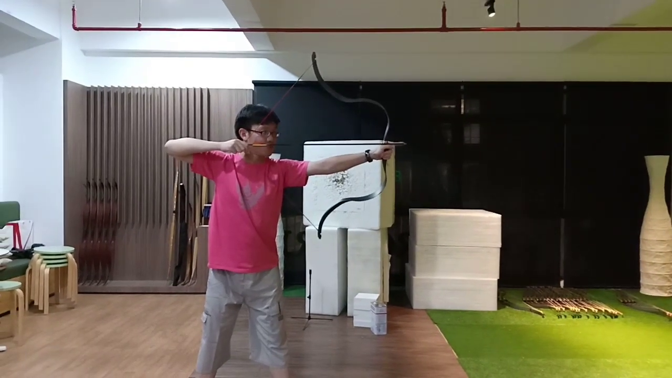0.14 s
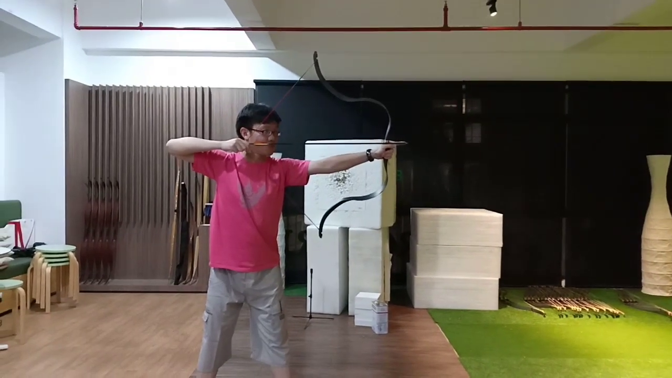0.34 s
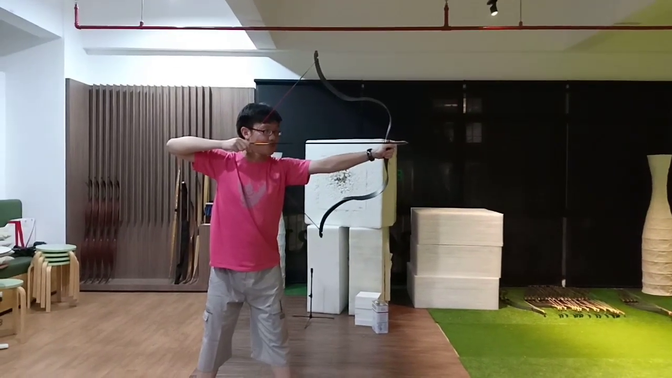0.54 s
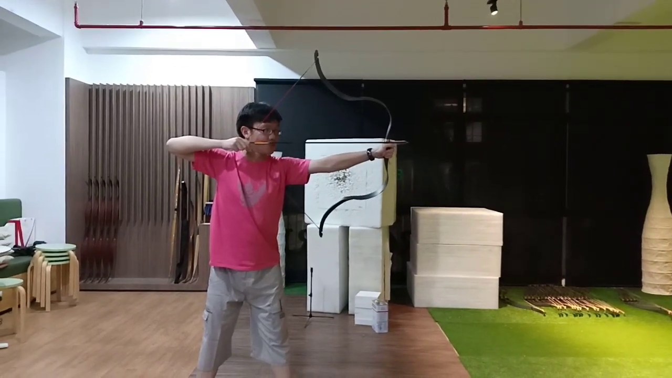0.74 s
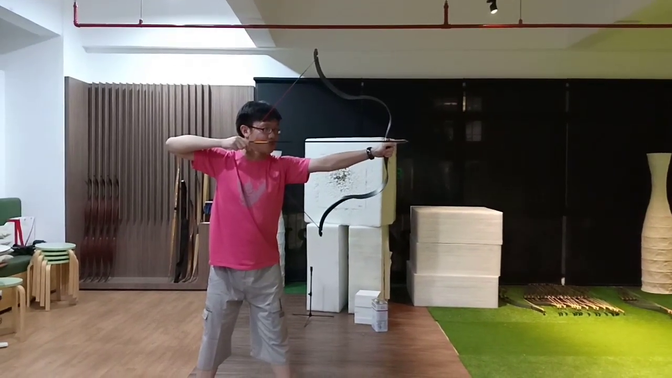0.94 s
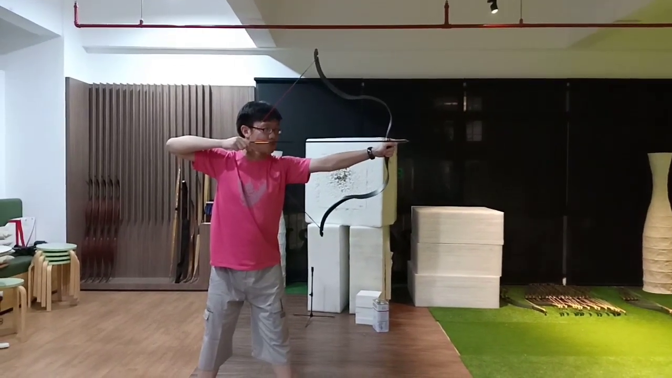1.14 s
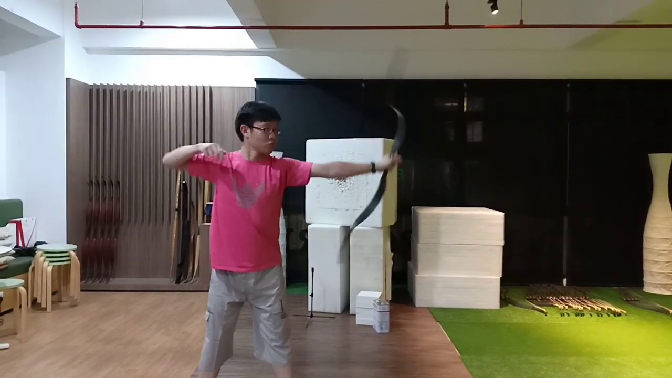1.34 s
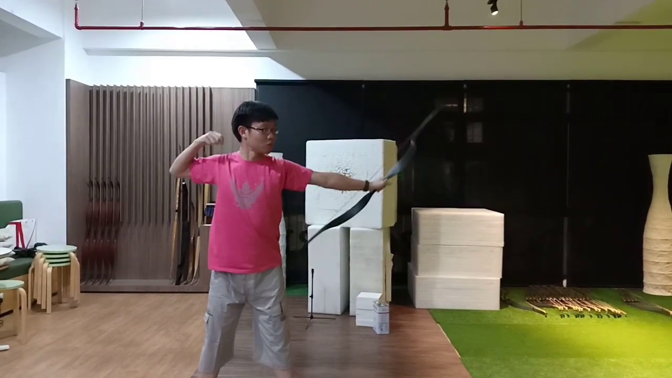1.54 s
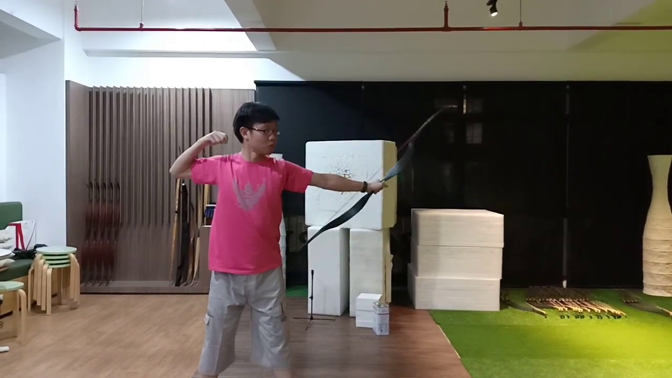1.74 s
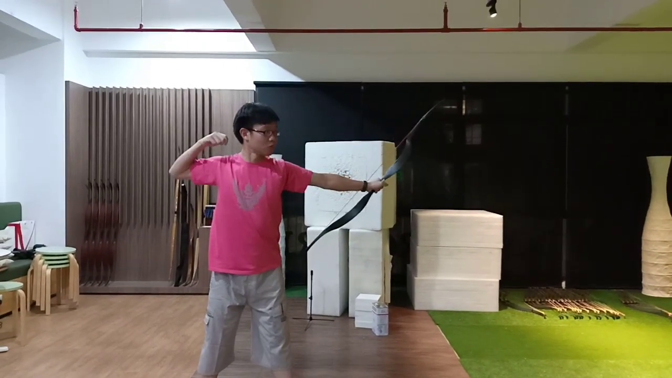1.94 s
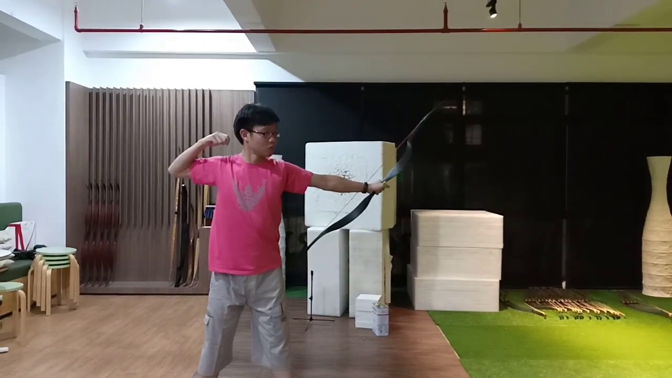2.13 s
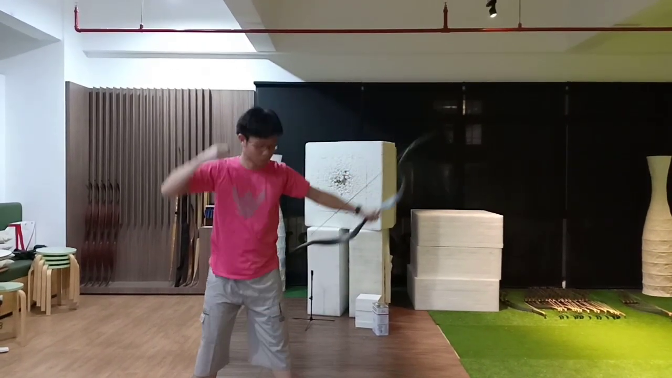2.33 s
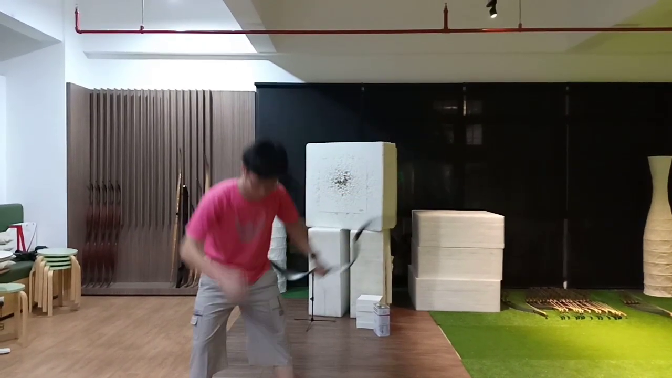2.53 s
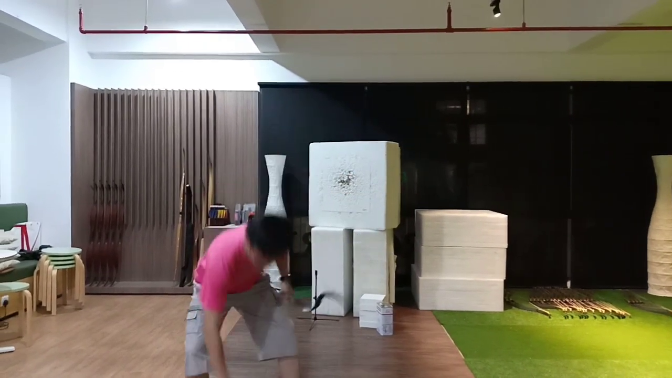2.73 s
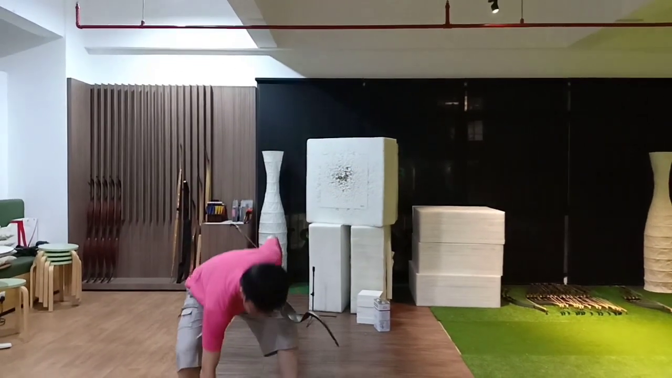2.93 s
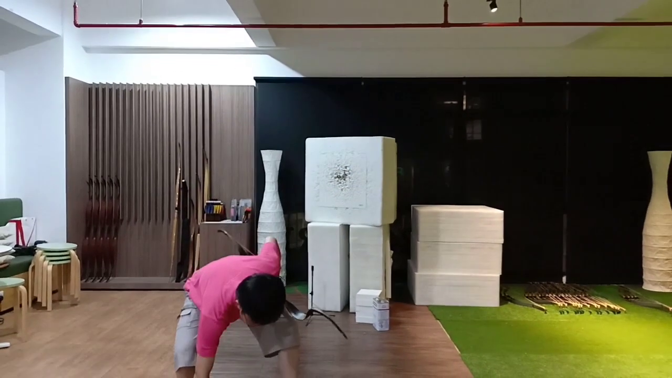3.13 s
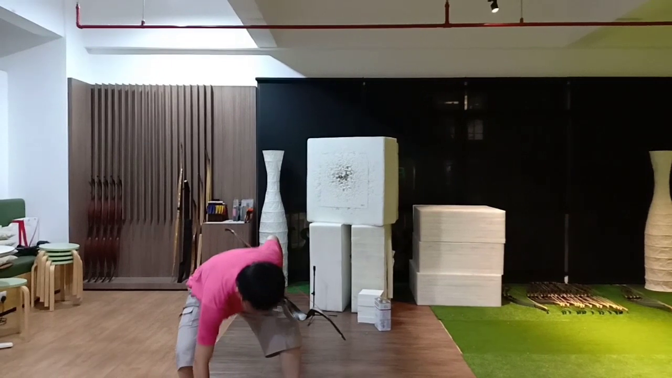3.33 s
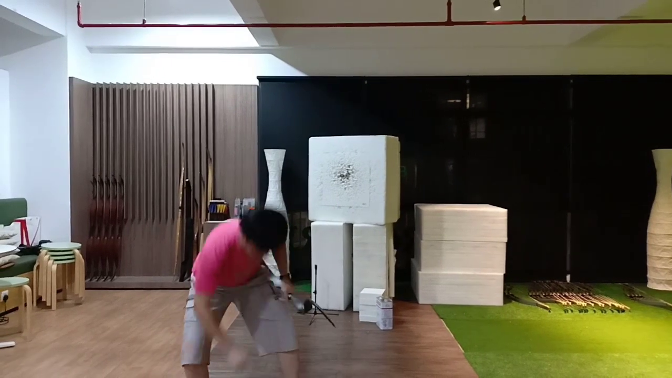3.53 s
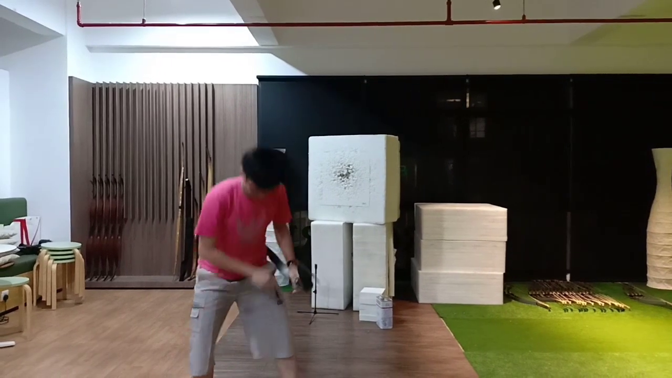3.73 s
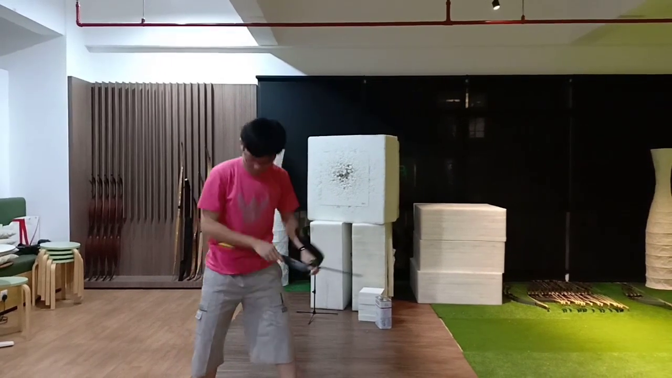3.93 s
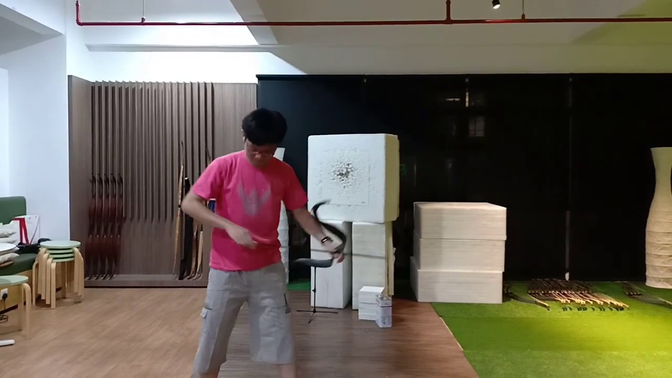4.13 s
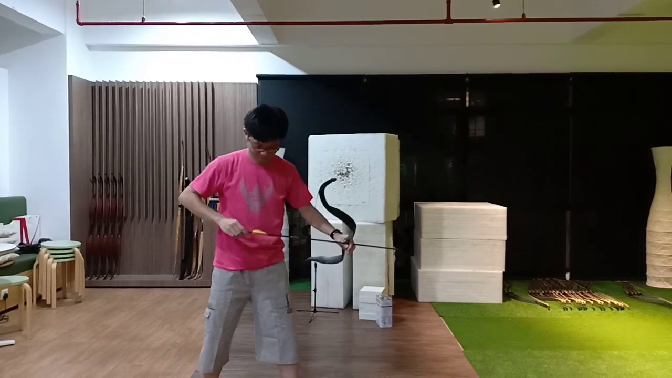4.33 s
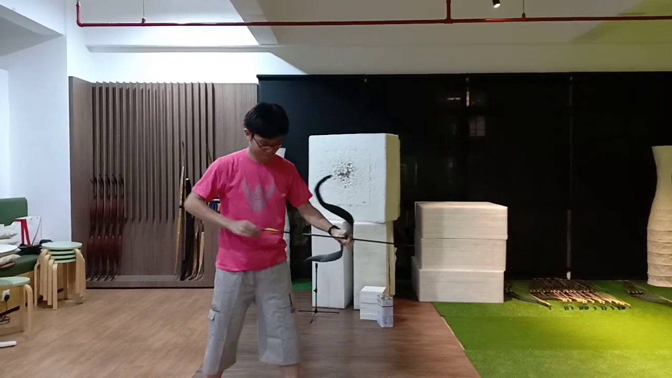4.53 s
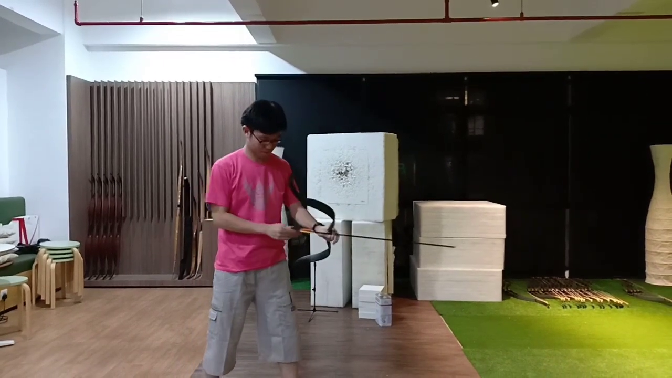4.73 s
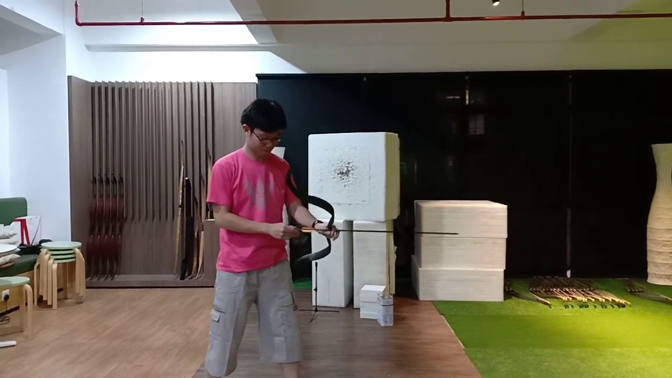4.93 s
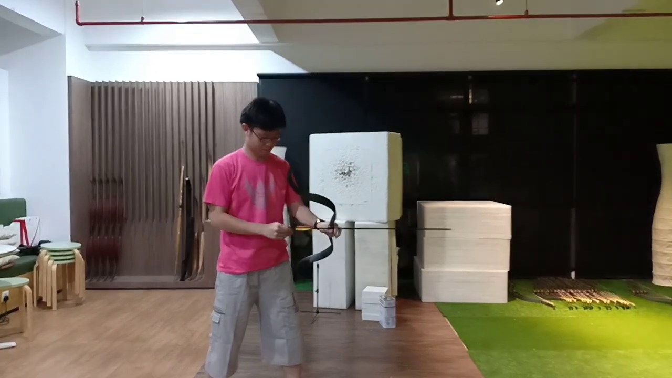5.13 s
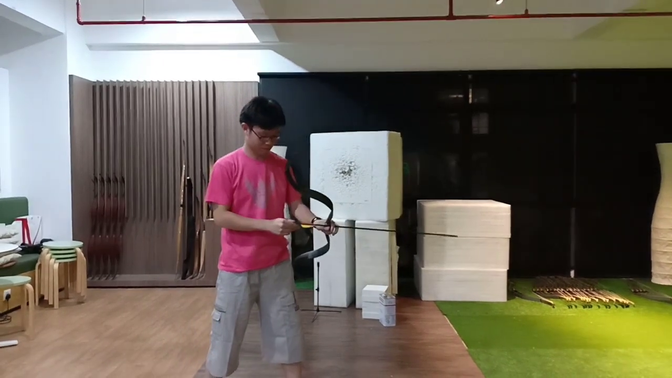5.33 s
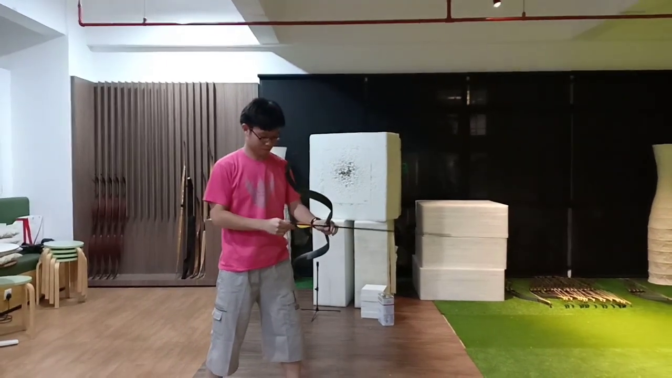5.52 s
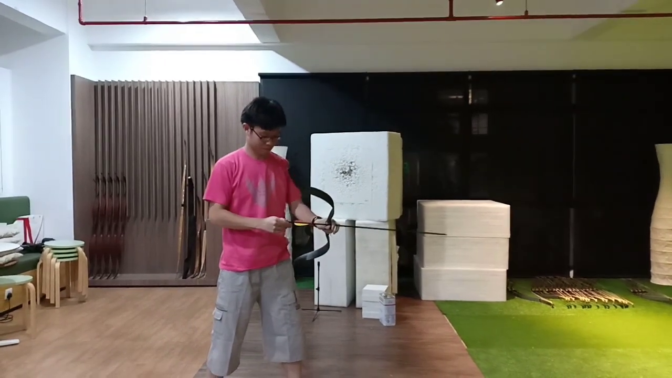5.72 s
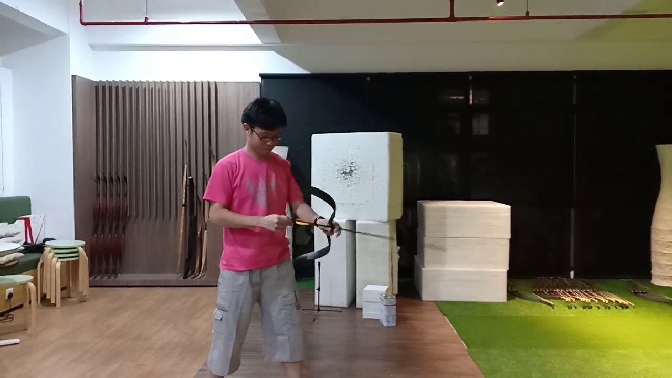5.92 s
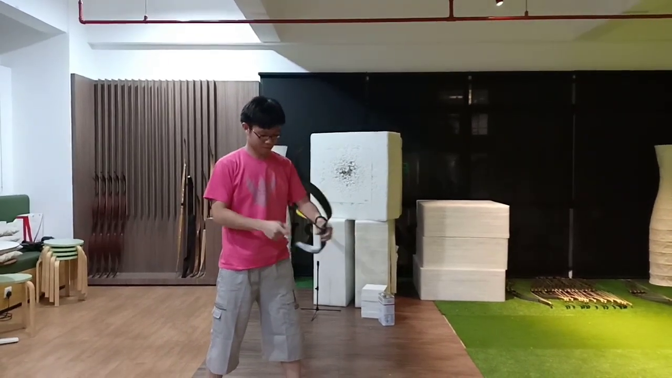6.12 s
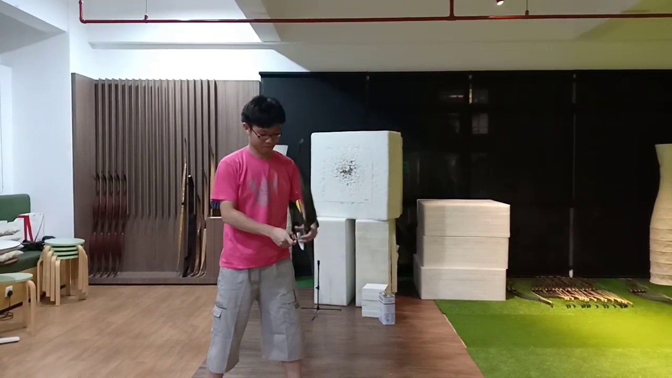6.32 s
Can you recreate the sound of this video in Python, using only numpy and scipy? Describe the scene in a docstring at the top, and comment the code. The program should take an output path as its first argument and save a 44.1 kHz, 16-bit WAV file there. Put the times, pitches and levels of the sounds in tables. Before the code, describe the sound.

A bowstring slaps, an arrow thuds loudly into foam, and soft steps and small taps follow over humming indoor ventilation.

```python
"""A hard-walled indoor archery range, on two microphones a hand apart that hear mostly the room.
An archer looses a recurve bow: string and shaft slap, the limbs ring and the arrow whirrs away.
A fifth of a second later it cracks into a foam target, and the thud comes back off the walls.
With a few soft steps he picks up another arrow, knocks it against the bow, slides it along and nocks it.
Ventilation rumbles, hisses and hums throughout."""
import sys
import numpy as np
from scipy import signal
from scipy.fft import rfft, irfft
from scipy.io import wavfile
from scipy.ndimage import uniform_filter1d

SR = 44100
rng = np.random.default_rng(int(sys.argv[2]) if len(sys.argv) > 2 else 0)


def materialize(psi):
    """Save the field psi as 16-bit PCM at rate SR to the path in sys.argv[1].

    A 1-D psi becomes a single channel; in a 2-D psi each row is a channel.
    """
    bounded = np.clip(np.atleast_2d(psi).T, -1, 1)
    quanta = np.round(bounded * 32767).astype(np.int16)
    wavfile.write(sys.argv[1], SR, quanta)


N = 285150
TIME = np.arange(N) / SR
AGE = TIME[:SR]  # the first second after a blow
FREQ = np.arange(N // 2 + 1) * SR / N + 1e-3


def bow():
    """Slaps set string and limbs ringing while the shaft rasps past the grip and whirrs off."""
    # The string slips free, the shaft grazes and slaps the grip, the string snaps taut. Each row:
    # start in seconds, level in dB, ring of the bow in dB relative to it, loss per rebound in dB.
    slaps = [(1.3157, -31, -15, 6), (1.3332, -28.5, -16, 10), (1.337, -22, -11.5, 3.5),
             (1.3593, -27, -0.5, 3.2)]
    # Modes of string and limbs. Each row: pitch in Hz, level in dB, t60 in seconds.
    bow_modes = [(66, -21, 0.25), (131.5, -11.5, .2), (183, -3, 0.059), (289, 7, 0.13), (425, 2.5, 0.08),
                 (570, -10, 0.22), (644, -3.5, 0.32), (960, -0.5, 0.074)]
    # Spectrum of a slap. Each row: frequency in Hz, level in dB.
    slap_colour = [(100, -23), (500, -3), (1000, -1.5), (1600, -7), (2200, 4), (3200, -3), (4500, 2),
                   (6000, -2), (7500, -17.5), (11000, -23), (16000, -24)]
    # Resonances of the departing shaft. Each row: centre in Hz, width in Hz, level in dB.
    whirr_peaks = [(2070, 13, -5), (2147, 26, 5), (2490, 87, 7), (2900, 270, 1), (3080, 50, -13),
                   (3810, 89, 5), (3900, 25, 7), (4440, 100, -44), (5080, 49, 2), (5920, 220, -19)]
    out = np.zeros(N)
    for s, db, ring_db, loss_db in slaps:
        add(out, s, undb(db + ring_db) * ring(bow_modes))
        for at, gain in rebounds(s, gap_s=0.0045, loss_db=loss_db, count=4):
            add(out, at, gain * undb(db) * burst(slap_colour, t60=0.037, tilt_db=1.55))
    whirr = undb(-42) * resonate(rng.standard_normal(N), whirr_peaks)
    rasp = undb(-33.5) * colour(grit(spread_db=0.5), slap_colour)
    # Both grow while the string drives the arrow and die as it flies off.
    out += swell(start_s=1.322, length_s=0.042, attack_s=0.019, t60=0.16) * (whirr + rasp)
    return hall(out, direct_db=2.0, wet_db=-0.1, pan_db=-4.5, lag_ms=0.1, build_s=0.00059)


def target(hit_s=1.5085):
    """Down the range the point cracks into the block, whose low thud comes back off the walls."""
    # The point breaks the target's face. Each row: frequency in Hz, level in dB.
    crack_colour = [(200, -23), (480, -7.5), (720, 2.5), (1100, -13), (1400, -6), (2000, -2.5), (2650, 1.5),
                    (3400, -11.5), (4200, -9.5), (4700, -9.5), (5600, -8), (7500, -23.5), (11000, -27),
                    (16000, -26)]
    # The foam's broad answer to the blow. Each row: frequency in Hz, level in dB.
    thud_colour = [(40, -41), (90, -21), (160, -8.5), (230, -10.5), (310, 1), (420, -4), (560, -8),
                   (730, 3.5), (870, 0), (1100, 0.5), (1350, -12), (1700, -9.5), (2600, -19.5), (4000, -37),
                   (12000, -61)]
    # Low resonances of the hall that ring with the thud. Each row: centre in Hz, width in Hz,
    # level in dB.
    thud_peaks = [(157, 25, -10), (309, 16, -2.5), (343, 30, -4), (424, 18, -12), (500, 41, -3.5),
                  (690, 35, -18), (756, 22, -1), (868, 22, -2.5), (980, 44, -1), (1026, 37, -1),
                  (1114, 18, -4)]
    crack, thud = np.zeros(N), np.zeros(N)
    add(crack, hit_s, undb(-8.5) * burst(crack_colour, t60=0.03))
    # Timed from the hit: near walls scatter the thud for a while, a far wall returns it in one piece.
    near_walls = swell(start_s=0, length_s=0.077, attack_s=0.021, t60=0.06)
    far_wall = swell(start_s=0.0499, length_s=0.007, attack_s=0.007, t60=0.044)
    blows = undb(3.5) * unit(rng.standard_normal(N) * near_walls)
    add(blows, 0, undb(-7) * unit(irfft(crunch(t60=0.096))))  # the blow itself
    blows += undb(1) * unit(rng.standard_normal(N) * far_wall)
    force = rfft(even(blows[:SR], size=30))
    resonances = undb(-25.5) * bells(np.arange(SR // 2 + 1), thud_peaks)
    body = np.hypot(contour(thud_colour), resonances)
    add(thud, hit_s, undb(-1.5) * unit(irfft(force * causal(body))))
    return (hall(crack, direct_db=-1.5, wet_db=1.0, pan_db=-3.0, lag_ms=0.33, build_s=0.0047)
            + hall(thud, direct_db=-0.5, wet_db=-2.5, pan_db=-0.6, lag_ms=0.18, build_s=0.0022))


def next_arrow():
    """Each touch chatters, clicking and ringing the shaft; in between it slides with a fine grain."""
    # Loose arrows clink as one is picked up. Each row: start in seconds, click in dB, ring in dB,
    # first rebound gap in seconds, loss per rebound in dB.
    clinks = [(3.0464, -49.5, -56.5, 0.012, 1.3), (3.3127, -63, -58.5, 0.028, 3.5)]
    # Modes of the loose arrows. Each row: pitch in Hz, level in dB, t60 in seconds.
    loose_modes = [(2560, 4.5, .3), (3040, -5, 0.26), (3700, -6, .15), (4090, -0.5, .27), (4160, -2, .3),
                   (4720, -1, 0.24), (4820, 0, 0.28), (4900, -5, 0.2), (6115, -24, .4), (6944, -25, 0.26),
                   (8721, -22, .3)]
    # The arrow touches bow and string. Each row: start in seconds, level in dB, ring in dB relative
    # to it, favoured pitch in Hz, tilt in dB per octave, first gap in seconds, loss per rebound in dB.
    taps = [(3.8888, -41.5, 6, 5760, 0.5, 0.014, 6), (4.234, -66.5, -4, 5480, 3, 0.016, 3),
            (4.7136, -67.5, -1, 5030, 2, 0.02, 5), (4.825, -64.5, -2, 6000, 5, 0.015, 5),
            (4.8838, -55.5, -1, 5270, -0.5, 0.016, 0.5), (5.102, -64, -6, 5400, 3, 0.024, 4.5),
            (5.4407, -51.5, -10, 5470, -0.5, 0.009, 0), (5.632, -63, -19, 5400, -1.5, 0.012, 9),
            (5.8048, -51, -9, 3830, 2.5, 0.014, 3)]
    # Bending modes of the shaft. Each row: pitch in Hz, level in dB, t60 in seconds.
    shaft_modes = [(1476, -6, 0.025), (2532, 3, 0.073), (2593, 0.5, 0.27), (2627, 0, 0.43), (2659, 0, 0.25),
                   (3740, -6.5, 0.04), (4100, -7, 0.099), (4770, -19, .15), (5260, -7, .07),
                   (5357, -2, 0.077), (5450, -8.5, .06), (5880, -14.5, 0.074), (7682, -29, 0.3),
                   (9450, -18, 0.046), (10300, -28, .2)]
    # Spectrum of a light click. Each row: frequency in Hz, level in dB.
    click_colour = [(200, -17), (900, -10.5), (1700, 0), (2400, 7), (3200, 4), (3900, 1.5), (4700, 4),
                    (5600, 2), (6300, -4), (7500, -14), (11000, -16), (16000, -19)]
    # Shaft and sleeve slide. Each row: start in seconds, length in seconds, level in dB.
    slides = [(2.57, 0.49, -75.5), (3.123, 0.23, -72), (4.164, 0.093, -67.5), (4.717, 0.05, -63),
              (4.9, 0.2, -79), (5.53, 0.08, -74), (5.977, 0.1, -81)]
    out = np.zeros(N)
    for s, click_db, ring_db, gap_s, loss_db in clinks:
        for at, gain in rebounds(s, gap_s, loss_db, count=4):
            click = burst(favour(click_colour, centre_hz=2400, boost_db=4), t60=0.069)
            add(out, at, gain * (undb(click_db) * click + undb(ring_db) * ring(loose_modes)))
    for s, db, ring_db, contact_hz, tilt_db, gap_s, loss_db in taps:
        for at, gain in rebounds(s, gap_s, loss_db, count=3):
            click = burst(favour(click_colour, contact_hz, boost_db=3), t60=0.036, tilt_db=tilt_db)
            shaft = ring(favour(shaft_modes, contact_hz, boost_db=5))
            add(out, at, gain * undb(db) * (click + undb(ring_db) * shaft))
    strokes = sum(undb(db) * swell(s, length_s, attack_s=0.36 * length_s, t60=0.29)
                  for s, length_s, db in slides)
    out += strokes * colour(grit(spread_db=0.5), click_colour, tilt_db=0.5)
    return hall(out, direct_db=6.5, wet_db=7.5, pan_db=-5.5, lag_ms=0.14, build_s=0.00034)


def feet():
    """Weight shifts on the wooden floor with dull thumps."""
    # Soft footfalls. Each row: start in seconds, level in dB.
    steps = [(2.725, -55), (3.461, -52), (5.722, -44.5), (5.992, -46)]
    # The floor's answer. Each row: frequency in Hz, level in dB.
    floor_colour = [(40, -16), (110, -9), (190, 4), (400, -10), (1200, -28), (8000, -55)]
    out = np.zeros(N)
    for s, db in steps:
        add(out, s, undb(db) * burst(floor_colour, t60=0.13))
    return hall(out, direct_db=-2, wet_db=-6, pan_db=-5, lag_ms=0.1, build_s=0.0033)


def ventilation():
    """Moving air rumbles and hisses from all sides, with narrow hums that waver and swell."""
    # Spectra of the rumble and the hiss. Each row: frequency in Hz, level in dB.
    rumble_colour = [(15, -39), (25, -69), (48, -12), (75, -12.5), (94, -3.5), (123, -8.5), (151, -4.5),
                     (220, -6.5), (332, -7.5), (362, -10), (394, -6.5), (565, -14), (730, -11.5),
                     (1500, -20), (1950, -28), (3300, -120)]
    hiss_colour = [(700, -22), (1400, -19), (1900, 0), (2300, 3), (2600, 1.5), (2850, 0), (3250, -8),
                   (4500, -12.5), (6200, -15), (7500, -22.5), (16000, -27)]
    # A low drone swells twice. Each row: start in seconds, length in seconds, pitch in Hz, level in dB.
    drone_swells = [(0, 0.26, 168.4, -54.5), (3.92, 0.45, 104.4, -56.5)]
    # Wavering hums. Each row: centre in Hz, width in Hz, level in dB.
    hums = [(102.9, 2.3, -64), (140.8, 12, -61), (170, 4.4, -71), (197, 7.5, -63), (520.8, 6.6, -67),
            (2830, 11, -73)]
    air = undb(-52.7) * colour(diffuse(N), rumble_colour)
    air += undb(-62.5) * colour(diffuse(N), hiss_colour)
    for s, length_s, hz, db in drone_swells:
        drone = resonate(diffuse(N), [(hz, 2, db)])  # 2 Hz wide
        air += swell(s, length_s, attack_s=0.044, t60=0.84) * drone
    return air + resonate(diffuse(N), hums)


def hall(x, direct_db, wet_db, pan_db, lag_ms, build_s):
    """Direct sound, then dense reflections that build up and die away, lingering in the midrange."""
    # Reverberation of the range. Each row: frequency in Hz, t60 in seconds.
    reverb_times = [(60, 0.5), (150, 0.96), (330, 1.2), (750, 1.28), (1100, 1.19), (1900, 0.84),
                    (2800, 0.75), (5500, 0.58), (10000, 0.71), (16000, 0.22)]
    hz, t60 = np.transpose(reverb_times)
    t = TIME[:2 * SR]
    field = rfft(diffuse(len(t)))
    octave = np.log2(np.linspace(1, SR / 2, field.shape[1]))
    bands = [np.interp(octave, np.log2(hz), band) for band in np.eye(len(hz))]
    tail = sum(irfft(field * band) * fade(t, decay) for band, decay in zip(bands, t60))
    tail *= 1 - np.exp(-t / build_s)
    response = undb(wet_db) * np.array([even(mic, size=70) for mic in tail])
    # The microphones face away, so the direct sound is a little dull; it reaches the right one first.
    shaded = undb(direct_db) * np.array([0.65, 0.35])
    add(response[0], lag_ms / 1000, shaded * undb(pan_db / 2))
    add(response[1], 0, shaded * undb(-pan_db / 2))
    return signal.fftconvolve(x[None], response, axes=1)[:, :N]


def diffuse(size, mic_gap_m=0.19):
    """Noise from all sides at two microphones: long waves reach both alike."""
    mid, side = rfft(rng.standard_normal((2, size)))
    alike = 0.97 * np.sinc(np.linspace(0, SR, len(mid)) * mic_gap_m / 343)
    mid, side = mid * np.sqrt((1 + alike) / 2), side * np.sqrt((1 - alike) / 2)
    return irfft(np.array([mid + side, mid - side]), size)


def rebounds(s, gap_s, loss_db, count, gap_growth=1.15):
    """Times and gains of a contact and its rebounds, each gap longer than the last."""
    k = np.arange(count)
    gaps = gap_s * gap_growth ** k
    return zip(s + np.cumsum(gaps) - gaps, undb(-loss_db * k))


def ring(modes, detune=0.00294):
    """Decaying modes; grip and point of contact shift their pitch and polarity with every blow."""
    out = 0
    for hz, db, t60 in modes:
        shift, polarity = rng.standard_normal(3)[1:]
        tone = np.sin(2 * np.pi * hz * (1 + detune * shift) * AGE) * fade(AGE, t60)
        out = out + np.sign(polarity) * undb(db) * unit(tone)
    return unit(out)


def burst(points, t60, tilt_db=0):
    """A contact rings through a body of the given colour."""
    return unit(irfft(crunch(t60) * causal(contour(points, tilt_db))))


def crunch(t60):
    """Spectrum of a short, irregular contact force."""
    return rfft(even(rng.standard_normal(SR) * fade(AGE, t60), size=60))


def grit(spread_db):
    """Friction: noise whose strength jumps every couple of milliseconds."""
    noise = rng.standard_normal(N)
    jumps = np.repeat(rng.standard_normal(N // 80 + 1), 80)[:N]
    return noise * undb(spread_db * jumps)


def favour(rows, centre_hz, boost_db, octaves=0.088):
    """Lift the dB column around the pitch that a contact drives best."""
    rows = np.array(rows, float)
    rows[:, 1] += boost_db * np.exp(-(np.log2(rows[:, 0] / centre_hz) / octaves) ** 2)
    return rows


def colour(x, points, tilt_db=0):
    """Shape a noise by (Hz, dB) points and a slope per octave; rms 1."""
    hz, db = np.transpose(points)
    octave = np.log2(np.linspace(1, SR / 2, x.shape[-1] // 2 + 1))
    gain = undb(np.interp(octave, np.log2(hz), db) + tilt_db * octave)
    shaped = irfft(rfft(x) * gain, x.shape[-1])
    return shaped / shaped.std()


def contour(points, tilt_db=0):
    """Gain for every hertz from (Hz, dB) points and a slope per octave."""
    hz, db = np.transpose(points)
    octave = np.log2(np.arange(SR // 2 + 1) + 1)
    return undb(np.interp(octave, np.log2(hz), db) + tilt_db * octave)


def resonate(x, peaks):
    """Pass a noise through resonances."""
    return irfft(rfft(x) * bells(FREQ, peaks), N)


def bells(freq, peaks):
    """Gain of (Hz, width, dB) resonances, each at its own rms level."""
    power = 0
    for hz, width, db in peaks:
        bell = 1 / (1 + ((freq - hz) / width) ** 2) ** 2
        power = power + undb(db) ** 2 * bell / bell.mean()
    return np.sqrt(power)


def even(x, size):
    """Spread the energy of a random decay evenly over frequency, in groups of size bins."""
    spectrum = rfft(x)
    power = np.abs(uniform_filter1d(np.abs(spectrum) ** 2, size=size))
    return irfft(spectrum * causal(power ** -0.5))


def causal(gain):
    """Spectrum of a filter with this gain that sounds only after it is struck."""
    cepstrum = irfft(np.log(gain + 1e-9))
    half = len(cepstrum) // 2
    return np.exp(rfft(np.r_[cepstrum[0], 2 * cepstrum[1:half]], len(cepstrum)))


def swell(start_s, length_s, attack_s, t60):
    """Envelope that rises, holds until its length is over and dies away."""
    age = TIME - start_s
    return np.clip(age / attack_s, 0, 1) * fade(np.maximum(age - length_s, 0), t60)


def fade(t, t60):
    """Exponential decay, 60 dB in t60 seconds."""
    return np.exp(-np.log(1000) * t / t60)


def unit(x):
    """Give a blow the energy of 10 ms at full level."""
    return x * np.sqrt(SR / 100 / np.sum(x ** 2))


def undb(db):
    """Decibels to gain."""
    return 10 ** (np.asarray(db) / 20)


def add(track, s, sound):
    """Mix a sound into a track at s seconds."""
    start = int(s * SR)
    track[start:start + len(sound)] += sound[:N - start]


def gain_control(x, threshold_db=-21, ratio=2.07, ahead_s=0.024, release_db_per_s=12):
    """The recorder turns down just ahead of loud sound and recovers slowly."""
    power = uniform_filter1d(np.mean(x ** 2, axis=0), size=441)
    over_db = np.maximum(10 * np.log10(np.abs(power) + 1e-12) - threshold_db, 0)
    recovery = release_db_per_s * TIME
    held_db = np.maximum.accumulate(over_db * (1 - 1 / ratio) + recovery) - recovery
    return x * undb(-np.interp(TIME + ahead_s, TIME, uniform_filter1d(held_db, size=600)))


def scene():
    """The shot, the hit and the reload over the air of the hall."""
    return bow() + target() + next_arrow() + feet() + ventilation()


def record(dry):
    """The right microphone favours the presence range; gain control ducks the hit."""
    presence_db = 3.5 * np.exp(-(np.log2(FREQ / 2600) / 1.04) ** 2)
    mics = irfft(rfft(dry) * undb(np.array([-presence_db, presence_db]) / 2), N)
    # The converter rounds peaks, sits slightly off zero and cuts the top.
    rounded = np.tanh(gain_control(mics)) + 0.001
    top_cut = signal.ellip(10, 0.1, 80, 15800, fs=SR, output="sos")
    return signal.sosfilt(top_cut, rounded)


dry = scene()
out = record(dry)
materialize(out)
```